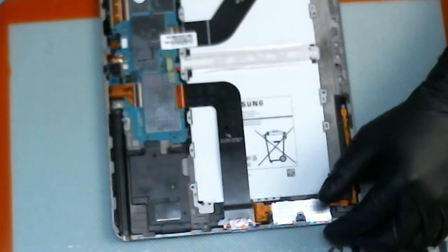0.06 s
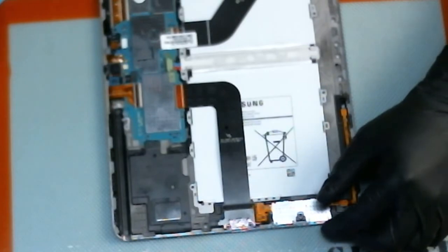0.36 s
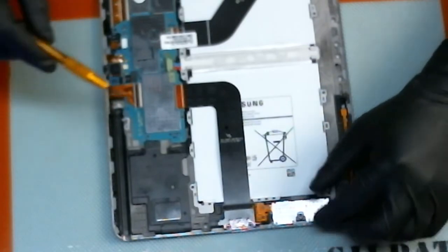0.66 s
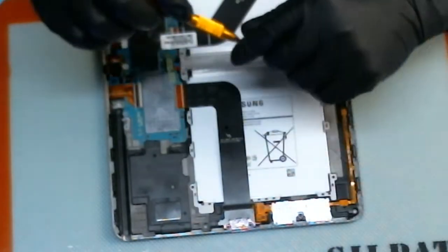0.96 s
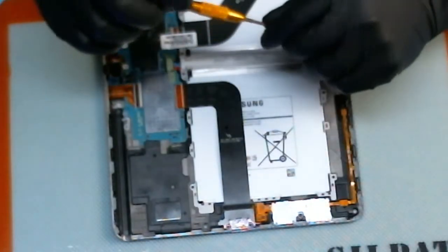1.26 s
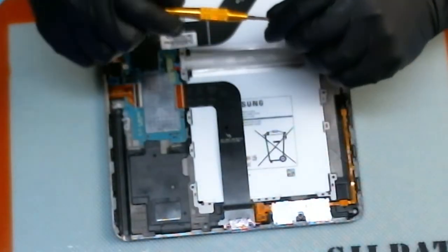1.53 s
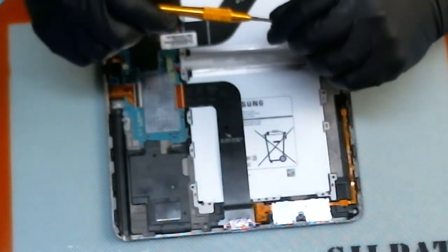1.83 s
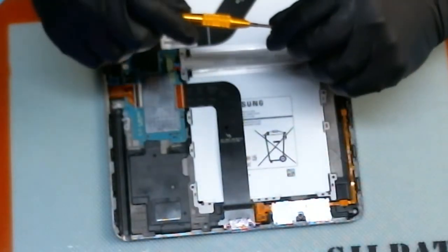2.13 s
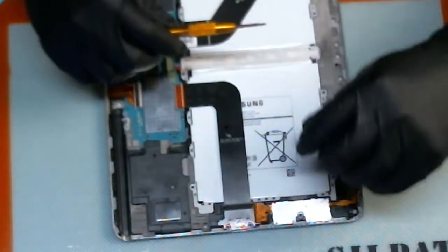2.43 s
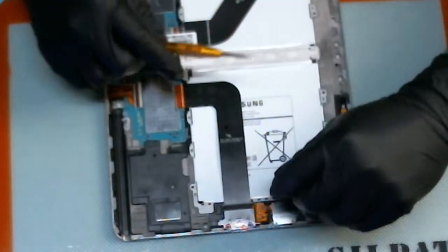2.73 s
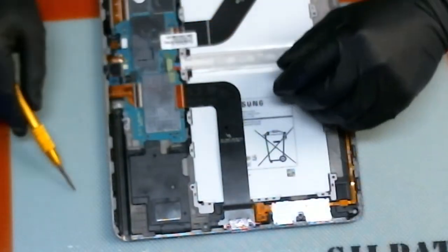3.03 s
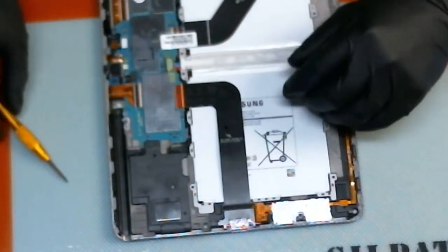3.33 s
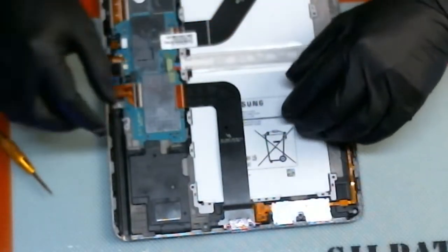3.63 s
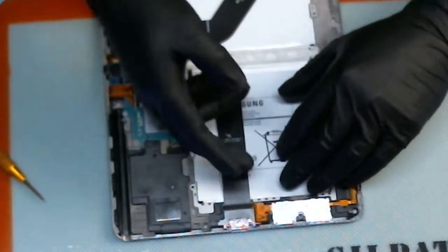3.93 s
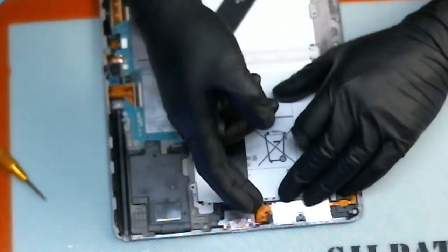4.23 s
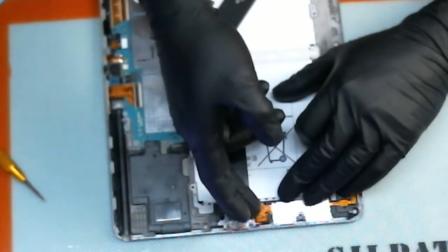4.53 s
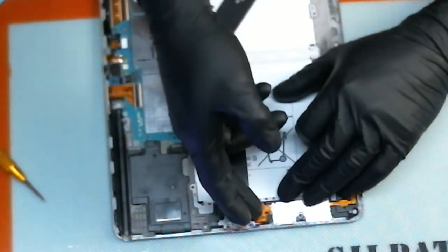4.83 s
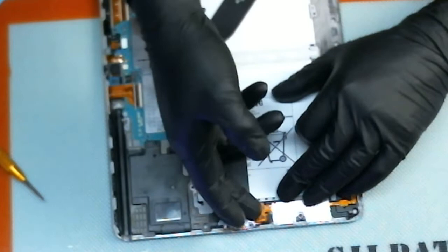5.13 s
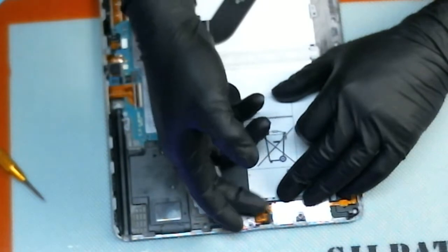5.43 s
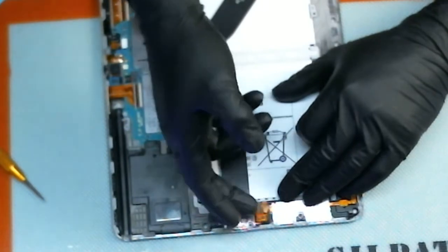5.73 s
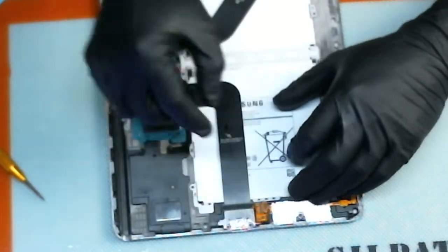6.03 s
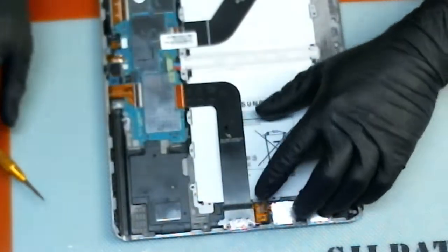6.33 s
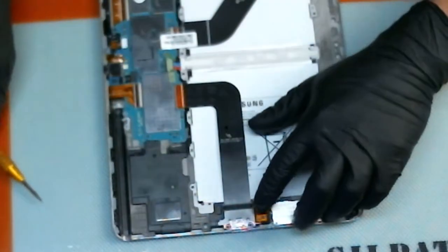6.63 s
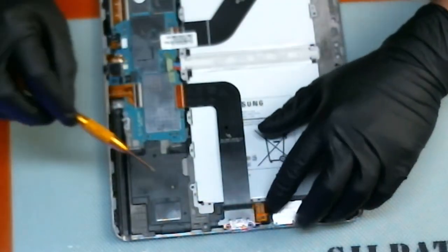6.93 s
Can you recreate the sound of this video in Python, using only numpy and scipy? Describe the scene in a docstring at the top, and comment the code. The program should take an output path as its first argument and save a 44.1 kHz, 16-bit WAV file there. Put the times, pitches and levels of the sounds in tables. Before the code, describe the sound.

Over the faint, steady hum of a fan in a small workshop, the parts of an opened tablet click and scrape lightly while fingertips rock it against a mat with dull thumps. A little screwdriver gives one brief squeak and, near the middle, clinks brightly as it is put on the bench. Then a connector snaps sharply twice, and quiet glove rubbing follows. Everything is close and dry.

```python
"""A small dry workshop, one microphone close to an opened tablet lying on a rubber bench mat.
A steady fan hums behind. Up close, gloves crease and rub, fingertips rock the tablet with soft thumps,
and clips and connectors click. A small metal screwdriver clinks as its shaft rings, squeaks once
by stick-slip and is laid down, its handle knocking the bench through the mat."""
import sys
import numpy as np
from scipy import signal
from scipy.fft import rfft, irfft
from scipy.io import wavfile

SR = 44100
rng = np.random.default_rng(int(sys.argv[2]) if len(sys.argv) > 2 else 0)


def file_out(sig):
    """Save sig as 16-bit WAV at sys.argv[1]."""
    # one column per channel
    cols = np.atleast_2d(sig).T
    # limit, then scale
    lim = np.clip(cols, -1, 1)
    pcm = np.round(lim * 32767).astype(np.int16)
    wavfile.write(sys.argv[1], SR, pcm)


N = 311346
AGE = np.arange(SR // 4) / SR  # time since a sound began [s]


def undb(db):
    """Decibels to gain."""
    return 10 ** (np.asarray(db) / 20)


def unit(x):
    """Scale to an rms of 1."""
    return x / np.sqrt(np.mean(x ** 2))


def fade(t60):
    """Exponential decay, 60 dB down after t60 seconds."""
    return np.exp(-np.log(1000) * AGE / t60)


def add(out, s, sound):
    """Mix a sound in at time s."""
    i = int(np.clip(s * SR, 0, N - 1))
    out[i:i + len(sound)] += sound[:N - i]


def colour(x, points, size=1024):
    """Minimum-phase filter through (frequency [Hz], level [dB]) points."""
    hz, db = np.transpose(sorted(points))
    bins_hz = np.fft.rfftfreq(size, 1 / SR)
    log_gain = np.log(undb(np.interp(np.log(bins_hz + 1), np.log(hz), db)))
    cepstrum = irfft(log_gain)[:size // 2]
    cepstrum[1:] *= 2
    return signal.fftconvolve(x, irfft(np.exp(rfft(cepstrum, size))))


def burst(t60):
    """Dense modes dying together: decaying noise of unit energy."""
    x = rng.standard_normal(len(AGE)) * fade(t60)
    return x / np.linalg.norm(x)


def walk(rate, size):
    """Smooth chance with a spread near 1, changing rate times a second."""
    steps = np.arange(size) * rate / SR
    return np.interp(steps, np.arange(size), rng.standard_normal(size))


def room(x, wet_db, t60, treble_t60=0.06, split_hz=9000, build_s=0.0027):
    """Direct sound plus a short tail off the bench and things nearby; the treble has its own decay."""
    tail = np.zeros(len(AGE))
    for band, band_t60 in (("low", t60), ("high", treble_t60)):
        sos = signal.butter(6, split_hz, band, fs=SR, output="sos")
        tail += signal.sosfilt(sos, rng.standard_normal(len(AGE))) * fade(band_t60)
    tail *= 1 - np.exp(-AGE / build_s)
    return x + undb(wet_db) * signal.fftconvolve(x, tail / np.linalg.norm(tail))[:N]


# moving air in the background: (frequency [Hz], relative spectral density [dB])
AIR_SPECTRUM = [(15, -68.5), (25, -37), (39, -23), (107, -3), (193, -2), (221, -1.5), (281, -9.5),
                (410, -5.5), (523, -11.5), (631, -14.5), (1020, -19), (1410, -22), (1750, -26),
                (2120, -26.5), (15500, -53)]
# fan and motor tones: (frequency [Hz], rms level [dB], width of the wander [Hz])
FAN_TONES = [(119.3, -69, 12), (141.7, -66.5, 20), (221.8, -63, 2.4), (424.2, -70, 15), (618.3, -73, 10),
             (1446, -77, 4), (11400, -101, 4.9)]


def fan(air_db=-56.5):
    """Behind the bench, a steady rush of air with a few slightly wandering tones."""
    rush = colour(rng.standard_normal(N + SR), AIR_SPECTRUM, size=16384)[SR:SR + N]
    out = undb(air_db) * unit(rush)
    for hz, db, width in FAN_TONES:
        pitch = hz + width / 2 * walk(2 * width, N)
        out += undb(db) * unit(np.sin(2 * np.pi * np.cumsum(pitch) / SR))
    return out


# a hand reaching across, near the microphone: (time [s], length [s], level [dB])
HAND_REACHES = [(0.827, 0.32, -83), (3.554, 0.57, -82), (5.85, 0.48, -78), (6.257, 0.41, -86.5)]
# thin rubber creasing: (frequency [Hz], level [dB])
GLOVE_SPECTRUM = [(800, -17), (2800, 5.5), (5000, 0), (7500, -3), (10500, 6.5), (13000, -14), (15500, -15)]


def gloves(creases_per_s=75, spread_db=6, brush_db=-6):
    """Flexing rubber creases in tiny ticks over a soft brushing."""
    out = np.zeros(N)
    creases = rng.random(N) < creases_per_s / SR
    strength = undb(spread_db * np.minimum(rng.exponential(size=N), 3))
    ticks = signal.fftconvolve(creases * strength, burst(t60=0.039))[:N]
    rustle = unit(ticks) + undb(brush_db) * rng.standard_normal(N)
    for s, length, db in HAND_REACHES:
        stroke = rustle[int(s * SR):][:int(length * SR)]
        add(out, s, undb(db) * colour(stroke * signal.windows.tukey(len(stroke), .4), GLOVE_SPECTRUM))
    return out


# what small parts radiate under a blunt and under a sharp contact: (frequency [Hz], level [dB])
BLUNT_SPECTRUM = [(1200, -3), (2100, -3.5), (3100, -8), (3950, 1.5), (4900, -3.5), (7800, -6),
                  (9200, -19.5), (11000, -34.5), (13000, -39), (15500, -40)]
SHARP_SPECTRUM = [(1200, -63), (2300, -14), (3200, 12), (4500, -1), (6800, -5.5), (9000, 7), (11000, 5.5),
                  (12200, -4), (15500, -25)]


def small_part(low_hz, sharpness, rolloff_db_per_octave=38, floor_db=-45):
    """Spectrum of a small part: little below its lowest resonance, more treble for a sharper contact."""
    hz = np.geomspace(200, 16000, num=96)
    blunt = np.interp(hz, *np.transpose(BLUNT_SPECTRUM))
    sharp = np.interp(hz, *np.transpose(SHARP_SPECTRUM))
    octaves_below = np.maximum(np.log2(low_hz / hz), 0)
    rolloff = np.maximum(-rolloff_db_per_octave * octaves_below, floor_db)
    return list(zip(hz, blunt + sharpness * (sharp - blunt) + rolloff))


# gloves and parts sliding: (time [s], length [s], level [dB], lowest resonance [Hz], sharpness [0-1])
SLIDES = [(0.465, 0.12, -56, 7140, 0.85), (0.634, 0.063, -50.5, 2670, 0.5), (0.758, 0.059, -56, 6800, 0.76),
          (1.554, 0.07, -68.5, 2910, 0.99), (1.937, 0.088, -63.5, 2900, 0.47),
          (2.899, 0.072, -53.5, 8800, 0.76), (3.172, 0.034, -62.5, 3940, 0.07),
          (4.152, 0.051, -70.5, 3300, 0.68), (5.434, 0.017, -37, 970, 0.), (5.47, 0.039, -41, 3820, 0),
          (6.135, 0.062, -66.5, 2800, 0.8), (6.916, 0.039, -57, 6550, 0.56),
          (7.001, 0.012, -56, 2980, 0.47)]


def rubs(grain_db=3.0, grains_per_s=700):
    """Sliding contact: a dense, uneven stream of tiny slips."""
    out = np.zeros(N)
    friction = unit(rng.standard_normal(N) * undb(grain_db * walk(grains_per_s, N)))
    for s, length, db, low_hz, sharpness in SLIDES:
        stroke = friction[int(s * SR):][:int(length * SR)]
        stroke = stroke * signal.windows.tukey(len(stroke), .6)
        add(out, s, undb(db) * colour(stroke, small_part(low_hz, sharpness)))
    return out


# fingertips pressing the tablet into the mat: (time [s], level [dB], pitch [Hz])
PRESSES = [(0.169, -43.5, 284), (0.305, -47.5, 409), (0.526, -35, 130.2), (0.552, -36.5, 143.6),
           (0.767, -36, 141), (1.49, -41.5, 133.7), (2.128, -43.5, 140), (2.171, -43.5, 134),
           (2.233, -44, 139), (2.262, -40, 135.3), (2.434, -43, 132.2), (2.748, -41.5, 142),
           (2.808, -39, 134), (2.849, -44.5, 129), (3.01, -44, 149), (3.776, -49, 400), (3.911, -45, 143),
           (4.222, -40, 119.4), (5.371, -45, 121), (5.491, -43.5, 145), (5.76, -45.5, 133),
           (6.103, -44, 140), (6.496, -45, 140), (6.947, -42, 139)]


def thumps(light_rise_s=0.0097, firm_db=-39, doubling_db=6.5, wobble=0.11, nudges_per_s=0.99):
    """The tablet rocks on the mat, longer under a firm press; the shifting load bends its pitch."""
    out = np.zeros(N)
    # lighter touches in between, with the same columns as PRESSES
    chance = rng.uniform(-1, 1, (int(nudges_per_s * N / SR), 2))
    nudges = [((k + .5 + shift / 2) / nudges_per_s, -48 + 3 * force, 146)
              for k, (shift, force) in enumerate(chance)]
    for s, db, hz in PRESSES + nudges:
        rise_s = light_rise_s * 2 ** (max(db - firm_db, 0) / doubling_db)
        swell = (AGE / rise_s * np.exp(1 - AGE / rise_s)) ** 2
        pitch = hz * (1 + wobble * walk(230, len(AGE)))
        phase = 2 * np.pi * np.cumsum(pitch) / SR
        overtone = undb(-10) * np.sin(1.7 * phase)
        add(out, s, undb(db) * swell * (np.sin(phase) + overtone))
    return out


def contact(crack=0.93, crack_t60=0.0053, body=0.59, body_t60=0.078):
    """A hard contact: one sharp push, a brief crack and the ring of nearby small parts."""
    x = crack * burst(crack_t60) + body * burst(body_t60)
    x[0] += .5
    return x / np.linalg.norm(x)


# clips and connectors, close up: (time [s], level [dB], lowest resonance [Hz], sharpness [0-1])
SNAPS = [(0.1405, -23.5, 5560, 0.89), (0.1646, -18, 5520, 0.66), (0.1731, -22, 5530, 0.8),
         (0.2364, -12, 5500, 0.73), (0.634, -15.5, 2860, 1), (1.6888, -11.5, 3370, 1),
         (1.991, -20.5, 9000, 0.92), (2.0384, -37, 3100, 0.98), (2.269, -27.5, 3490, 1),
         (4.0049, -29.5, 3500, 0.02), (4.0457, -34, 3780, .2), (4.739, -24.5, 4820, 0.),
         (5.4259, -6, 3600, 0.1), (5.43, -1, 1100, 0.26), (5.6108, -22, 3720, 0.1),
         (5.6193, -6.5, 3860, 0.04)]


def clicks(ring_db=-37, ring_t60=0.039):
    """Clips, cable ends and the frame snap; each part rings briefly at its lowest resonance."""
    out = np.zeros(N)
    for s, db, low_hz, sharpness in SNAPS:
        spectrum = small_part(low_hz, sharpness)
        resonance_db = np.interp(low_hz, *np.transpose(spectrum))
        ring = fade(ring_t60) * np.sin(2 * np.pi * low_hz * AGE)
        add(out, s, undb(db) * colour(contact(), spectrum))
        add(out, s, undb(db + resonance_db + ring_db) * ring)
    return out


# the screwdriver's handle landing: (time [s], level [dB], cutoff of the soft contact [Hz])
LANDINGS = [(3.044, -37, 388), (3.4, -37, 930)]
# modes of the bench top: (frequency [Hz], level [dB], t60 [s])
BENCH_MODES = [(208, -4.5, 0.1), (276, 1.5, 0.069), (392, -6, 0.18), (461, -2, 0.05), (572, 1, 0.1),
               (685, -1.5, 0.045), (820, -3.5, 0.074), (990, -6, .05)]


def knocks(attack_s=0.00064):
    """The handle rings the bench through the mat, which slows the attack."""
    out = np.zeros(N)
    attack = 1 - np.exp(-AGE / attack_s)
    for s, db, cutoff_hz in LANDINGS:
        for hz, mode_db, t60 in BENCH_MODES:
            ring = fade(t60) * np.sin(2 * np.pi * (hz * AGE + rng.random()))
            dulling = np.hypot(1, (hz / cutoff_hz) ** 4)
            add(out, s, undb(db + mode_db) * attack * ring / dulling)
    return out


# the metal tip slipping twice: (time [s], length [s], share spent swelling [0-1],
# starting pitch [Hz], settled pitch [Hz], level [dB], scrape relative to the tone [dB])
TIP_SLIPS = [(1.3338, 0.0187, 0.16, 4060, 3740, -43, -7), (1.35, .037, 0.47, 2375, 3063, -39, -14)]
# the squeak's first four harmonics: (level [dB])
SQUEAK_HARMONICS = [-1, -2, -3.5, -8]


def squeak(jitter=0.02, glide_share=.42):
    """Stick-slip of metal on metal: each slip swells, glides in pitch and dies, with a little scrape."""
    out = np.zeros(N)
    scrape_spectrum = [(1200, -27), (2400, 1.5), (11500, 6.5), (15000, -10)]
    treble_rolloff = [(9500, 0.5), (12500, -6.5), (15000, -24)]
    for s, length, swell_share, start_hz, settled_hz, db, scrape_db in TIP_SLIPS:
        progress = np.clip(AGE / length, 0, 1)
        swell = np.sin(np.pi * np.interp(progress, [0, swell_share, 1], [0, .5, 1]))
        glide_hz = np.interp(progress, [0, glide_share], [start_hz, settled_hz])
        pitch = glide_hz * (1 + jitter * walk(1300, len(AGE)))
        phase = 2 * np.pi * np.cumsum(pitch) / SR
        tone = sum(undb(level) * np.sin(k * phase) for k, level in enumerate(SQUEAK_HARMONICS, 1))
        scrape = colour(rng.standard_normal(len(AGE)), scrape_spectrum)[:len(AGE)]
        add(out, s, undb(db) * swell * (swell * tone + undb(scrape_db) * scrape))
    return colour(out, treble_rolloff)[:N]


# the screwdriver's clinks and the swells of its beating ring, close to the microphone:
# (time [s], tick level [dB], ring level [dB], tilt of the ring [dB/octave], grip [0-1])
SHAFT_RINGS = [(0.5782, -14.5, -49, 18.5, 0.68), (0.6326, -13.5, -47.5, 10.5, 0.94),
               (2.2671, -24, -45, 8.5, 1.), (3.0380, -10, -31.5, -7, 0.17), (3.0400, -5.5, -44, -5, 0.3),
               (3.0775, -11, -36.5, -5, 0.27), (3.081, -9, -44.5, 12.5, 0.6), (3.103, -18, -43.5, 3, 0.5),
               (3.386, -28, -62, 17.5, 0.), (3.401, -10.5, -42, -2, 0.56), (3.414, -44.5, -52, 19, 0.),
               (3.4467, -11, -38.5, 13, 0.03), (6.6316, -39, -59, 18, 0.84), (6.812, -35.5, -59.5, 5, .7)]
# its three bending modes, each split in two: (frequency [Hz], t60 [s], partner [Hz], partner level [dB])
SHAFT_MODES = [(3188, .095, 3222, -7), (5350, .055, 5456, -7), (11733, .085, 11762, -10)]


def screwdriver(hard_rise_s=.0006, hard_db=-15, doubling_db=10, pivot_hz=6480, grip_damping=0.81):
    """The shaft ticks and rings; its split modes beat and the fingers damp them."""
    out = np.zeros(N)
    tick_spectrum = [(700, -58.5), (2000, -39), (2750, -2), (4500, -3.5), (6800, -5.5),
                     (8300, 0.5), (10500, 1), (12500, -7), (15500, -34.5)]
    free_db, muted_db = (1, 5.5, 4), (-2.5, -15.5, 0)  # per mode: a full grip mutes the second most
    for s, tick_db, ring_db, tilt, grip in SHAFT_RINGS:
        tick = contact(crack=.65, crack_t60=.008, body=.45, body_t60=.07)
        add(out, s, undb(tick_db) * colour(tick, tick_spectrum))
        # entries with a faint tick rise slowly
        rise_s = hard_rise_s * 2 ** ((hard_db - tick_db) / doubling_db)
        attack = 1 - np.exp(-(AGE / rise_s) ** 2)
        for (hz, t60, partner_hz, partner_db), mode_db, grip_db in zip(SHAFT_MODES, free_db, muted_db):
            db = ring_db + mode_db + tilt * np.log2(hz / pivot_hz) + grip_db * grip ** 2
            decay = fade(t60 * (1 - grip_damping * grip))
            chatter = 1 + .3 * walk(350, len(AGE))  # the loose tip rattles in its holder
            ring = np.sin(2 * np.pi * hz * AGE) + undb(partner_db) * np.sin(2 * np.pi * partner_hz * AGE)
            add(out, s, undb(db) * attack * chatter * decay * ring)
    return out


def scene():
    """Close handling with little room around it, over the fan, in mono."""
    clinks = room(screwdriver(), wet_db=-7.5, t60=0.1, treble_t60=0.083)
    handling = room(clicks() + rubs() + gloves(), wet_db=-9.5, t60=0.041, treble_t60=0.08)
    tip = room(squeak(), wet_db=-6.0, t60=0.06, treble_t60=0.079)
    thuds = room(thumps() + knocks(), wet_db=-14.5, t60=.17)
    return (fan() + thuds + handling + tip + clinks)[None]


def record(dry, low_cut_hz=46, top_hz=15800):
    """The microphone sheds the deep bass and the recorder cuts the top."""
    thin = signal.sosfilt(signal.butter(4, low_cut_hz, "high", fs=SR, output="sos"), dry)
    return signal.sosfilt(signal.ellip(10, .2, 70, top_hz, fs=SR, output="sos"), thin)


dry = scene()
out = record(dry)
file_out(out)
```